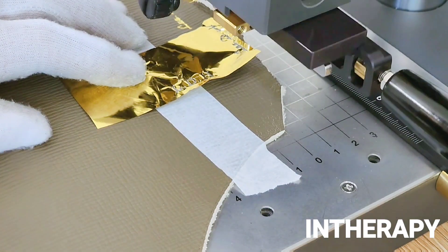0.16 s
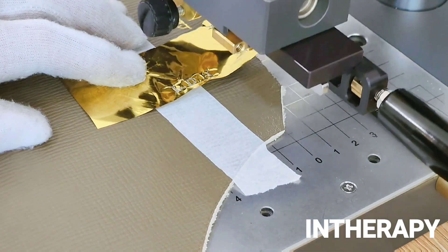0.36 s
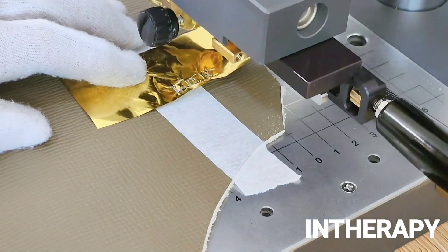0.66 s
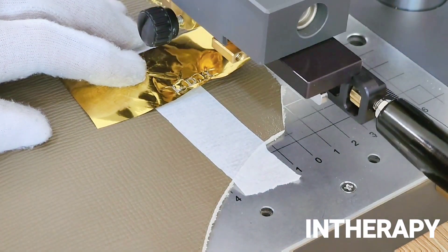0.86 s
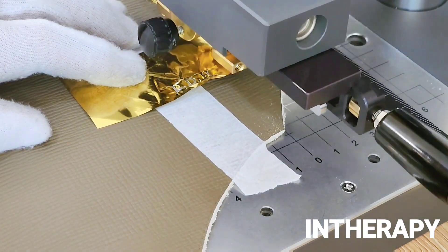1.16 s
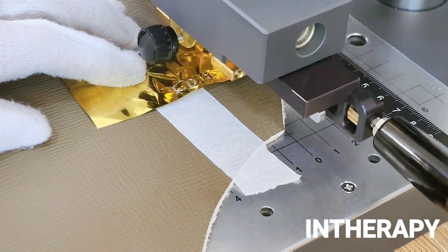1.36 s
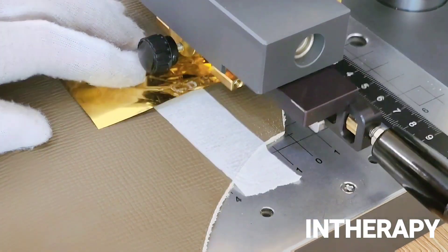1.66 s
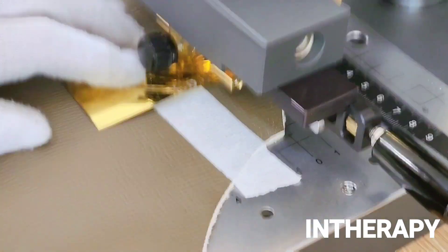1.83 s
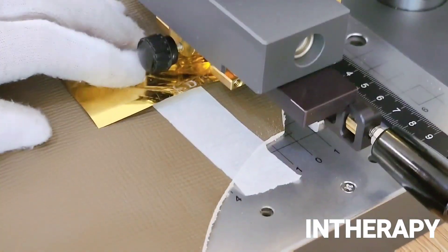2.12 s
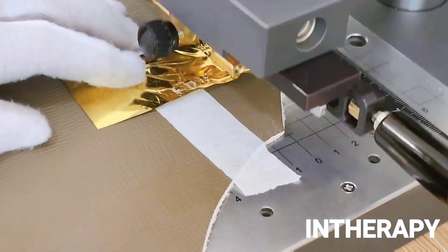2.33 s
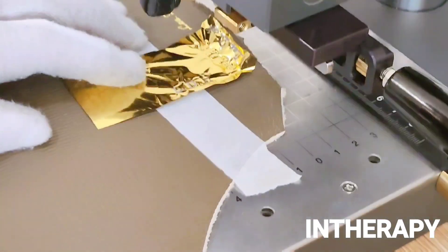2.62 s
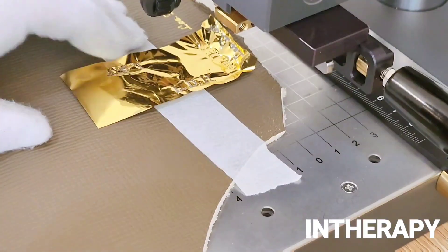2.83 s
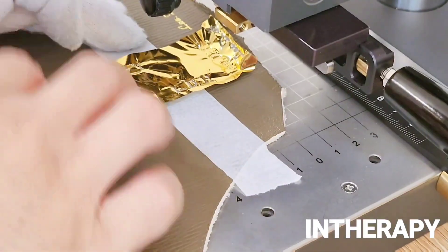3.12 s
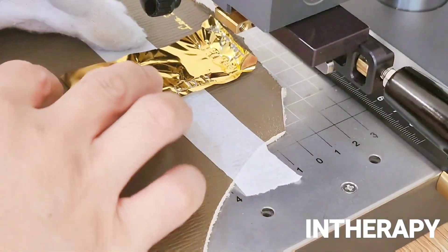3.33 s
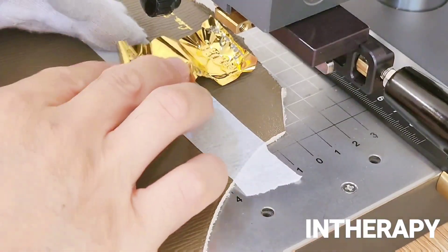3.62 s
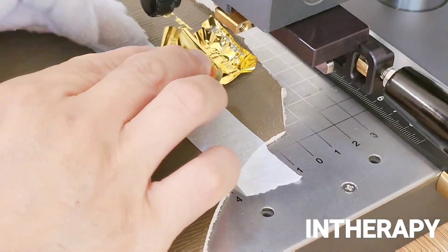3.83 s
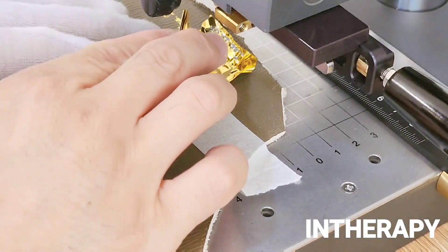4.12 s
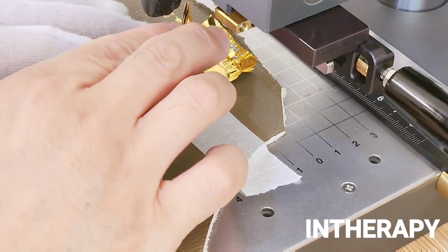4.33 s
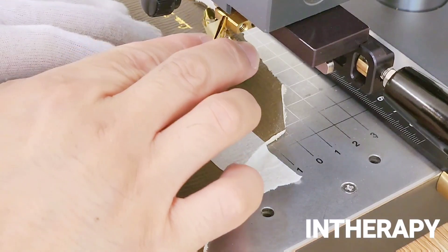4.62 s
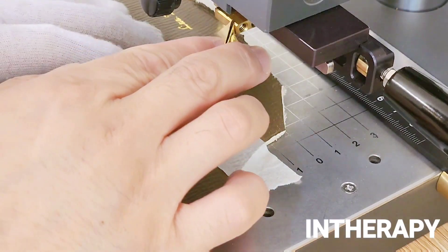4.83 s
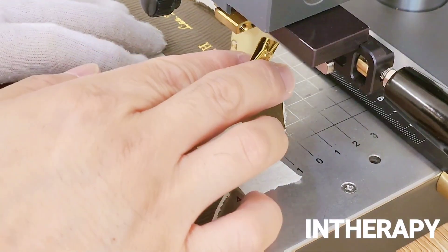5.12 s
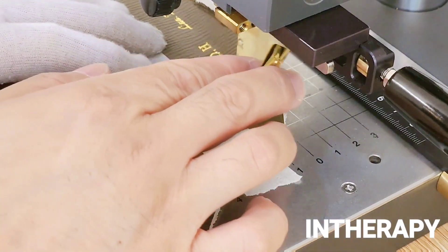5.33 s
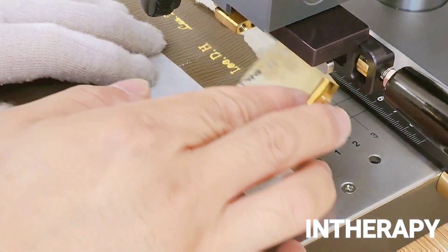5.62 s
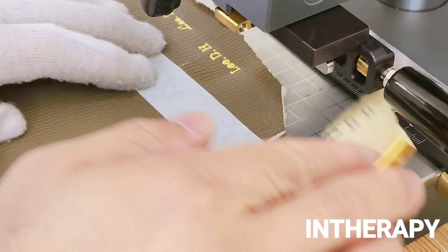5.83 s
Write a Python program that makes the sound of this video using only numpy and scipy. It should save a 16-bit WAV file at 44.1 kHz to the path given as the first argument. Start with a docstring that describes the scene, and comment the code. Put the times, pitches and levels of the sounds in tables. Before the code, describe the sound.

A low, slightly wavering machine hum runs throughout, in a small workshop room with a slight, short echo. At about 0.6 and 1.1 seconds a stamping press gives two soft, dull thuds through the bench. Four louder knocks follow at about 1.7, 1.9, 2.3 and 2.7 seconds, the last three strongest. Each joins a low thump with a metal clack, small rattling ticks and a brief ring from the press. The ticks die away by 3 seconds, leaving only the hum. From about 3.5 seconds a hand peels thin metal foil off a sheet. It buckles in short, bright, irregular crinkles over a fine crackle, quieter than the knocks. The crinkling comes in little tugs, busiest around 4.2 to 4.6 seconds and near 5.1 seconds. After a brief gap, a last flurry sounds from 5.4 to 5.6 seconds, and the hum remains.

```python
"""A stamping press is worked on a bench: a few soft thuds, then four knocks with rattling ticks.
The thuds make the bench ring; the clacks and ticks of the metal parts make the press frame ring.
Then a hand peels thin metal foil off a sheet, and it buckles in short, bright crinkles.
A small room smears these sounds, and a machine hums low behind them."""
import sys
import numpy as np
from scipy import signal
from scipy.fft import rfft, irfft
from scipy.io import wavfile
from scipy.ndimage import uniform_filter1d

SR = 44100
rng = np.random.default_rng(int(sys.argv[2]) if len(sys.argv) > 2 else 0)


def dump_mix(stems):
    """Bounce the given channels to the path in sys.argv[1] as a 16-bit WAV at rate SR."""
    frames = np.atleast_2d(stems).T  # one column per channel
    limited = np.clip(frames, -1, 1)  # hard clip at full scale
    pcm = np.round(limited * 32767).astype(np.int16)
    wavfile.write(sys.argv[1], SR, pcm)


N = 263277

# five pitch ranges that shape the snaps of press and foil: (low edge [Hz], high edge [Hz])
BANDS = [(300, 700), (700, 1400), (1500, 4000), (4000, 9000), (9000, 14000)]


def bench_thuds():
    """Each blow of the press is a short, smooth push that makes the bench top ring."""
    # blows and their rebounds: (time [s], level [dB])
    blows = [(.644, -26.5), (1.087, -24.5), (1.698, -18), (1.707, -13.5), (1.769, -37), (1.828, -29.5),
             (1.88, -33), (1.944, -11.5), (1.962, -18), (2.001, -25), (2.033, -23.5), (2.066, -23.5),
             (2.308, -16), (2.323, -12), (2.334, -10), (2.394, -26.5), (2.434, -27.5), (2.487, -27),
             (2.649, -10), (2.702, -21), (2.735, -24.5), (2.843, -32)]
    # tones of the bench top: (pitch [Hz], level [dB], time to fade by 60 dB [s])
    bench_tones = [(60, -38, 0.1), (90.8, -7, 0.016), (111, 7, 0.05), (131.2, -2, 0.12), (198.7, -8, 0.14),
                   (271, -10, 0.096)]
    contact_ms = 5.09
    n = int(contact_ms * SR / 1000) + 3
    push = np.zeros(N)
    for s, db in blows:
        start = int(s * SR)
        push[start:start + n] -= undb(db) * np.hanning(n) / (n / 2)
    ringing = sum(undb(db) * ring(push, hz, t60) for hz, db, t60 in bench_tones)
    return band(ringing, 50, 1600)


def press_knocks():
    """Heavy parts clack and light parts tick; both make the press frame ring."""
    # heavy parts: (time [s], level at 1 kHz [dB], tilt [dB per octave], fall [ms], boosted pitch [Hz])
    clacks = [(1.696, -46, -6.5, 2.7, 450), (1.704, -37.5, -10.5, 3.5, 1080),
              (1.938, -25.5, -5.5, 1.9, 1640), (1.941, -23.5, -9, 3.7, 588), (1.957, -45, 0.5, 3.7, 1520),
              (1.972, -49, -5, 6.5, 635), (2.03, -47.5, -6, 3.8, 1640), (2.055, -49, -7, 6.3, 1580),
              (2.069, -45, -7, 1.5, 1600), (2.276, -53.5, -10, 4, 413), (2.297, -43, -6.5, 3.3, 445),
              (2.3078, -30, 1.5, 1.1, 4400), (2.3144, -17, -2, 1.8, 4500), (2.321, -37, 2, 2.6, 1170),
              (2.346, -40, -10.5, 2.3, 388), (2.389, -49, -2, 4.7, 2240), (2.42, -57, 0.5, 34, 2264),
              (2.5213, -56, -1, 5.7, 2430), (2.651, -36.5, -7, 1.8, 454), (2.654, -25, -6, 2.45, 1100),
              (2.684, -45, -3.5, 3.2, 604), (2.706, -36, -8, 2.8, 420), (2.707, -38, -5, 1.7, 2210),
              (2.74, -48, -7, 9.3, 2120)]
    # light parts: (time [s], level [dB], fall [ms], boosted pitch [Hz])
    ticks = [(1.563, -55, 5.8, 3620), (1.664, -55.5, 18, 3360), (1.683, -45.5, 3.2, 8150),
             (1.693, -43.5, 2.7, 8900), (1.727, -49, 7.1, 5430), (1.79, -60, 1.6, 12000),
             (1.833, -54, 1.8, 13100), (1.908, -44.5, 8.2, 9300), (1.938, -31, 4.1, 10600),
             (1.96, -51.5, 8, 8950), (2.03, -48, 3.0, 4300), (2.3145, -50, 1.5, 13100),
             (2.654, -54, 3, 6560), (2.707, -58, 2, 8500), (2.326, -44.5, 3, 11900), (2.346, -54, 2, 13000),
             (2.448, -43.5, 1.7, 3600), (2.829, -57, 4, 8350), (2.843, -53, 1.8, 12200),
             (2.885, -65, 5.6, 7300)]
    # tones of the frame: (pitch [Hz], level [dB], time to fade by 60 dB [s])
    frame_tones = [(305.7, -5, 0.33), (391.3, -7.5, 0.37), (452, -21, 0.23), (495, -3, 0.081),
                   (582, -4.5, 0.067), (645, -1.5, 0.086), (860, -42, 0.11), (1050, -26, 0.3),
                   (1200, -16, 0.33), (1520, -4, 0.05), (1520, -5, 0.1), (1670, -4, 0.052),
                   (1923, -7, 0.13), (2245, -4, 0.055), (2180, -6.5, 0.19), (2300, -4, 0.058),
                   (2340, -6, 0.094), (2650, -6.5, 0.087)]
    # tone colour of a clack before its tilt, one value for each of BANDS: (level [dB])
    clack_colour = [-2, -2.5, 2, -5, -14.5]
    tick_colour, tick_rise_ms = [-8.5, -27, -4.5, -3, -4], 0.62
    octaves = np.log2(np.sqrt(np.prod(BANDS, axis=1)) / 1000)  # from 1 kHz to each band's middle
    rows = []
    for s, db, tilt, fall_ms, hz in clacks:
        rise_ms = 1.54 / undb(db + 40) ** 0.48  # harder clacks rise faster
        rows.append((s, db, clack_colour + tilt * octaves, rise_ms, fall_ms, hz))
    rows += [(s, db, tick_colour, tick_rise_ms, fall_ms, hz) for s, db, fall_ms, hz in ticks]
    hits = bursts(rows, BANDS, uneven_db=1.6, bass_db=-27.0, peak_db=10.0)
    into_frame_db = -44
    # loose joints make every tone flutter
    frame = sum(undb(into_frame_db + db + 6.5 * wander(130)) * ring(hits, hz, t60)
                for hz, db, t60 in frame_tones)
    return hits + frame


def foil_crinkles():
    """The foil buckles in bright snaps; a wide fold has more low sound than a narrow one."""
    # buckles: (time [s], level [dB], extra in the lowest band [dB], fall [ms], boosted pitch [Hz])
    crinkles = [(3.5356, -56, -8, 2, 7200), (3.56, -47.5, -12, 6.9, 12960), (3.5769, -43, -18, 6, 6150),
                (3.6, -48, -15, 2, 12880), (3.63, -44.5, -24, 2.7, 11670), (3.6878, -51, -13, 1.3, 4310),
                (3.7171, -47, -16, 7, 4700), (3.7262, -42.5, -15, 3.5, 5730),
                (3.795, -38.5, -16, 2.2, 10100), (3.8187, -43, -16, 1.7, 12880),
                (3.8688, -47.5, -8, 2.8, 7150), (3.8827, -49, -9, 3, 9390), (3.958, -43.5, -14, 0.72, 7400),
                (4.0026, -37.5, -11.5, 2.8, 12400), (4.04, -48.5, -7, 5, 11760),
                (4.0467, -43, -15, 1.8, 7340), (4.0663, -53, -5, 6.5, 5560), (4.0885, -46, -11, 4.2, 9260),
                (4.1309, -43.5, -7, 2.8, 12000), (4.17, -38, -7.5, 2.9, 12580),
                (4.1911, -43, -4, 1.3, 12450), (4.2021, -51.5, 2, 8, 8270), (4.2228, -38, -6, 2.9, 5530),
                (4.2912, -33, -4.5, 0.89, 5270), (4.304, -43, -6, 4.1, 5810), (4.3189, -41, -11, 1.4, 5250),
                (4.3262, -39.5, -11, 3.7, 12270), (4.347, -46, -6, 5.6, 2280), (4.441, -34, -12, 2.5, 9200),
                (4.4918, -42, -6, 3, 8400), (4.501, -39.5, -4.5, 2.7, 11800), (4.5115, -42, -11, 2.5, 9200),
                (4.5205, -35.5, -8.5, 1.9, 5000), (4.5946, -36.5, -8.5, 2.1, 12270),
                (4.604, -36, -11, 3.3, 10500), (4.6202, -42.5, -4, 4, 3200),
                (4.6282, -35, -5.5, 4.5, 10100), (4.794, -40.5, -18, 1.7, 5080), (4.826, -39, -8, 3, 12960),
                (4.8362, -39, -3.5, 3.2, 3330), (4.846, -41.5, -12, 3, 12960), (4.872, -45, -15, 1.9, 5040),
                (4.904, -43, -13, 1.7, 12960), (4.945, -45.5, -6, 5.6, 5160),
                (4.9593, -40, -3.5, 3.7, 3400), (5.0112, -51, -6, 5, 12960), (5.0216, -39, -10, 4.8, 11890),
                (5.032, -39.5, -9.5, 5.8, 4470), (5.067, -39, -9, 8.2, 9900), (5.0814, -37, -8, 5, 10500),
                (5.1191, -39.5, -12, 3.2, 10470), (5.1273, -38, -9, 2.1, 12750), (5.1445, -45, -4, 5, 5120),
                (5.1579, -42, -7.5, 4.5, 12960), (5.169, -43.5, -5, 1.5, 8910),
                (5.1967, -51.5, -1, 2.4, 10420), (5.208, -54, -13, 9.5, 7580), (5.2332, -46, -7.5, 2, 4480),
                (5.2434, -49.5, -16, 3.4, 10470), (5.4137, -39.5, -19, 2.8, 5680),
                (5.433, -44, -7, 6.2, 4250), (5.4482, -39.5, -10, 4, 12830), (5.459, -38, -2, 3.5, 10420),
                (5.4841, -31, -9.5, 2.9, 11400), (5.5124, -46.5, -2, 1.4, 3660),
                (5.5207, -38, -17, 1.7, 12920), (5.5348, -41, -15, 3, 2700), (5.546, -45, -8, 4.5, 12660),
                (5.553, -47.5, -9, 5.5, 11110), (5.5681, -36, -10, 5, 12900), (5.586, -42.5, -7, 1.8, 8300),
                (5.599, -50, 0, 5.5, 2890)]
    rows = []
    for s, db, low_db, fall_ms, hz in crinkles:
        rise_ms = 0.64 + 0.3 * fall_ms
        rows.append((s, db, [low_db, 0, -1], rise_ms, fall_ms, hz))
    buckles = bursts(rows, BANDS[2:], uneven_db=4.0, bass_db=-3.0, peak_db=3.5)
    return buckles * undb(1.4 * wander(420))  # each buckle is itself a quick run of smaller snaps


def foil_crackle():
    """The pulled foil crackles finely: each tug of the hand rises, holds and lets go."""
    # tugs of the hand: (start [s], length [s], level [dB])
    tugs = [(3.3, .2, -78), (3.543, 0.11, -59), (3.684, 0.19, -58.5), (3.99, 0.21, -61.5),
            (4.294, 0.047, -50.5), (4.433, .09, -60), (4.594, 0.033, -57), (4.684, .1, -65.5),
            (4.8, 0.11, -56.5), (4.946, 0.031, -52), (5.012, 0.15, -49), (5.408, 0.19, -53)]
    # tone colour of the crackle: (pitch [Hz], relative level [dB])
    foil_colour = [(1000, -30), (1600, -52), (2500, 3.5), (4500, 7), (7000, 1.5), (10000, 2.5),
                   (14500, 6.5)]
    rise_db_per_s, fall_db_per_s, slack_db = 700, 400, -75
    t = np.arange(N) / SR
    pull_db = np.where(t > tugs[0][0], slack_db, -200)  # from the first tug on, even slack foil whispers
    for start, length, db in tugs:
        drop_db = np.maximum(rise_db_per_s * (start - t), fall_db_per_s * (t - start - length))
        pull_db = np.maximum(pull_db, db - np.maximum(0, drop_db))
    crackle = level(colour(grit(N, spread_db=3.1), foil_colour), 0)
    return crackle * undb(pull_db + 2.4 * wander(210))


def machine_hum():
    """Noise rings in a machine's casing as wavering tones, over the broad noise of the room."""
    # tones of the casing: (pitch [Hz], width [Hz], level [dB])
    hum_tones = [(55.6, 8.4, -46), (95.5, 11.9, -46.5), (118.85, 11.8, -51), (133.7, 23, -49.5),
                 (197.5, 25.4, -58.5), (241.2, 18, -62.5), (282, 41, -62.5), (405, 50, -71.5),
                 (576.7, 11, -73), (682.4, 22, -72), (774.4, 63, -68), (1423, 203, -69)]
    # the lowest tone swells and sinks: (time [s], level change [dB])
    swell = [(0, -2), (.3, -4), (.66, 1.5), (.76, -8), (.864, 7), (.96, -2.5), (1.8, 7), (2.95, -3),
             (4.3, -2.5), (4.4, 13.5), (4.63, -6.5), (4.93, 7.5), (5.05, -1.5), (5.23, -2.5), (5.4, 13.5),
             (5.54, -5), (5.75, 2), (5.97, -16)]
    # tone colour of the room noise: (pitch [Hz], relative level [dB])
    air_colour = [(20, -14.5), (32, -25.5), (45, -3), (84, -16), (110, -12.5), (160, -16.5), (220, -18.5),
                  (350, -23.5), (600, -30), (1000, -31.5), (1600, -32.5), (2500, -39.5), (5000, -52.5),
                  (9000, -57), (14500, -67.5)]
    out = level(colour(rng.standard_normal(N), air_colour), -51.5)
    hiss = level(band(rng.standard_normal(N), 2003, 4900), -76.5)
    out += hiss * undb(2.8 * wander(7.4))  # a faint hiss comes and goes
    for hz, width, db in hum_tones:
        t60 = np.log(1000) / (np.pi * width)
        tone = ring(ring(rng.standard_normal(N), hz, t60), hz, t60)
        if hz < 105:  # the lowest two are steadier: even out their random swings
            tone /= uniform_filter1d(tone ** 2, size=SR // 25) ** 0.33
        waver_db = curve(swell) if hz < 75 else 1.1 * wander(4.09)
        out += level(tone, db) * undb(waver_db)
    return out * undb(1.04 + 0.37 * wander(1.0))  # the workshop's noise drifts


def room(x):
    """The small room adds a smooth echo that dies sooner in the treble."""
    # bands of the echo: (pitch [Hz], time to fade by 60 dB [s], relative level [dB])
    echo_bands = [(159.3, 0.41, -18.5), (640, 0.32, -19.5), (1776, 0.37, -15), (5910, 0.23, -13.5),
                  (12000, 0.16, -20)]
    t = np.arange(SR // 2) / SR
    tail = np.zeros(len(t))
    for hz, t60, db in echo_bands:
        noise = band(rng.standard_normal(len(t)), hz / 1.263, min(hz * 2.03, 20000))
        tail += undb(db) * noise * 1000. ** (-t / t60) / np.sqrt(t60 * hz / 4)
    rise = 1 - np.exp(-t / 0.00067)
    return x + signal.fftconvolve(x, rise * tail)[:N]


def snap(db, band_db, rise_ms, fall_ms, peak_hz, bands, uneven_db, bass_db, peak_db):
    """One noisy snap swells and fades; the struck spot boosts one pitch and colours the rest unevenly."""
    ms = (np.arange(4096) - 1024) / SR * 1000
    shape = np.exp(np.where(ms < 0, ms / max(rise_ms, .2), -ms / max(fall_ms, .3)))
    spectrum = rfft(shape * grit(4096, spread_db=0.97))
    # share the energy evenly among all pitches before colouring
    spectrum *= np.sqrt(np.sum(shape ** 2) / uniform_filter1d(np.abs(spectrum) ** 2, size=40))
    lo, hi = np.transpose(bands)
    per_hz = db + np.asarray(band_db) - 10 * np.log10((hi - lo) / (SR / 2))
    bass = [(lo[0] / 5, per_hz[0] + bass_db - 16), (lo[0] / 3, per_hz[0] + bass_db)]
    outline = [*bass, *zip(np.sqrt(lo * hi), per_hz), (hi[-1], per_hz[-1])]
    ripples = list(zip(np.linspace(300, 15000, num=50), uneven_db * rng.standard_normal(50)))
    hump = [(peak_hz / 1.23, 0), (peak_hz, peak_db), (peak_hz * 1.22, 0)]
    return colour(colour(colour(irfft(spectrum), outline), ripples), hump)


def bursts(rows, bands, **material):
    """Place one snap per row; a row is the time of its peak [s], then snap's first five settings."""
    out = np.zeros(N + 4096)
    for s, *settings in rows:
        start = int(s * SR) - 1024
        out[start:start + 4096] += snap(*settings, bands, **material)
    return out[:N]


def grit(n, spread_db):
    """Noise whose samples are tiny snaps of very unequal size."""
    return rng.standard_normal(n) * undb(spread_db * rng.exponential(size=n))


def wander(rate):
    """A smooth random drift, roughly 1 up or down, that turns about `rate` times a second."""
    hold = int(SR / rate)
    steps = np.repeat(rng.standard_normal(N // hold + 1), hold)
    return uniform_filter1d(uniform_filter1d(steps, hold), hold)[:N]


def ring(x, hz, t60):
    """Let x ring one tone that fades by 60 dB in t60 seconds."""
    pole = np.exp(2j * np.pi * hz / SR - np.log(1000) / (t60 * SR))
    return signal.lfilter([1], [1, -pole], x).imag


def band(x, lo_hz, hi_hz):
    """Keep the pitches between two limits."""
    return signal.sosfilt(signal.butter(N=3, Wn=[lo_hz, hi_hz], btype="band", fs=SR, output="sos"), x)


def colour(x, points):
    """Turn pitches up or down along points of (pitch [Hz], level change [dB])."""
    hz, db = np.transpose(points)
    pitches = np.arange(len(x) // 2 + 1) * SR / len(x) + 1
    gain = undb(np.interp(np.log(pitches), np.log(hz), db))
    return irfft(rfft(x) * gain, len(x))


def curve(table):
    """Join points of (time [s], value) with straight lines."""
    return np.interp(np.arange(N) / SR, *np.transpose(table))


def level(x, db):
    """Scale x to an average (rms) level."""
    return x * undb(db) / np.sqrt(np.mean(x ** 2))


def undb(db):
    """Turn decibels into a number to multiply by."""
    return 10 ** (np.asarray(db) / 20)


def scene():
    """Press and foil sound in the room, over the hum."""
    press = bench_thuds() + press_knocks()
    foil = foil_crackle() + foil_crinkles()
    return (room(press + foil) + machine_hum())[None]


def record(dry):
    """The highest treble steps down and is then cut off steeply."""
    step_hz, top_hz = 14100, 15321
    dulled = colour(dry[0], [(20, 0), (step_hz, 0), (step_hz + 450, -30), (top_hz, -40)])
    treble_cut = signal.ellip(8, .2, 70, top_hz, fs=SR, output="sos")
    return signal.sosfilt(treble_cut, dulled)[None]


dry = scene()
out = record(dry)
dump_mix(out)
```